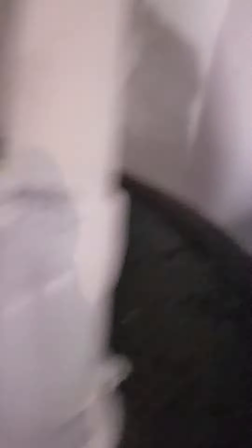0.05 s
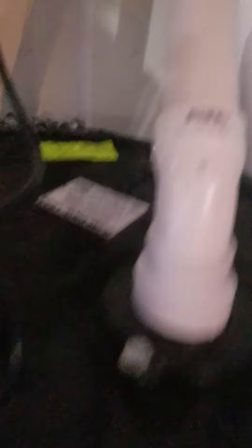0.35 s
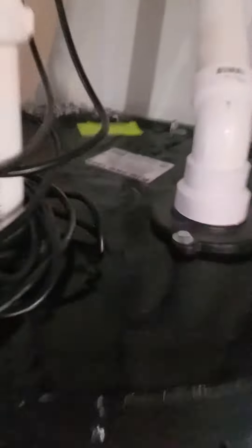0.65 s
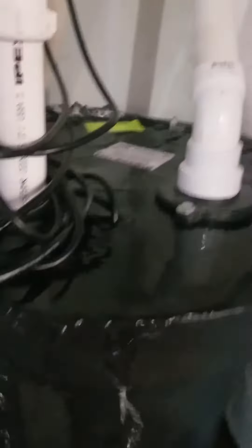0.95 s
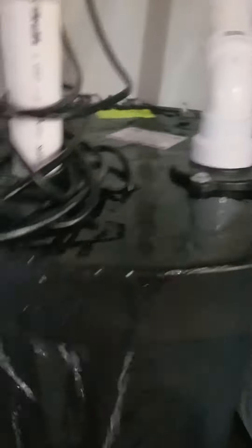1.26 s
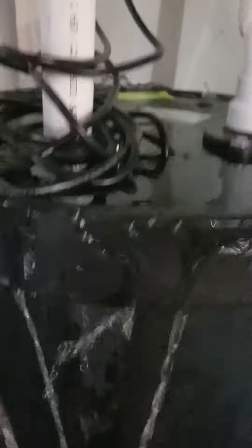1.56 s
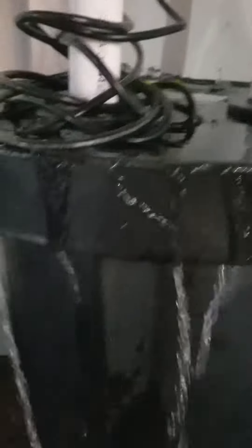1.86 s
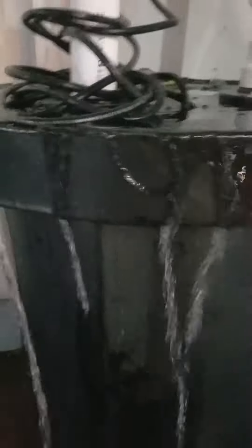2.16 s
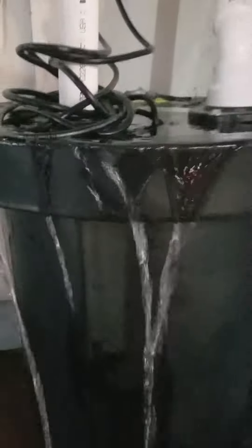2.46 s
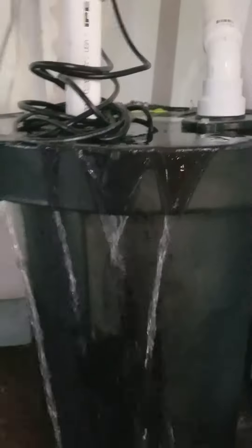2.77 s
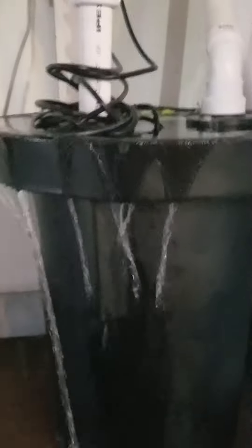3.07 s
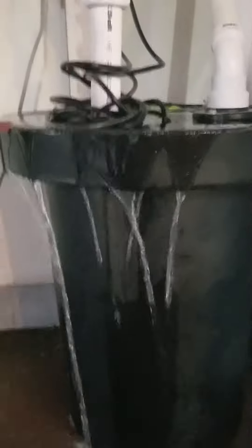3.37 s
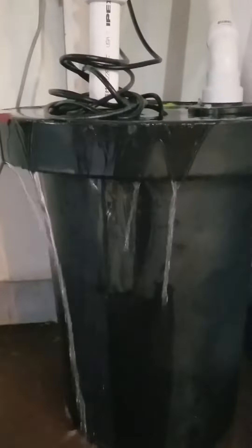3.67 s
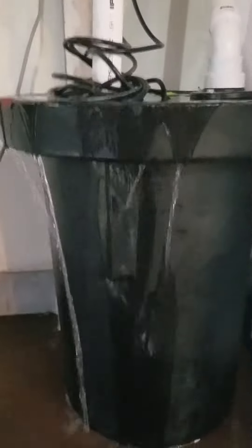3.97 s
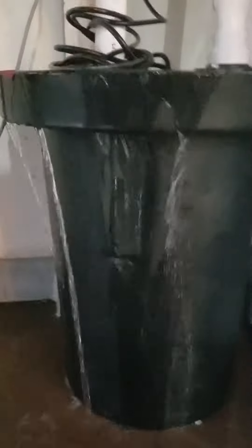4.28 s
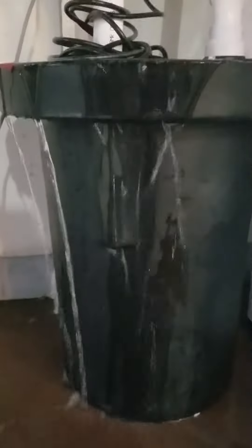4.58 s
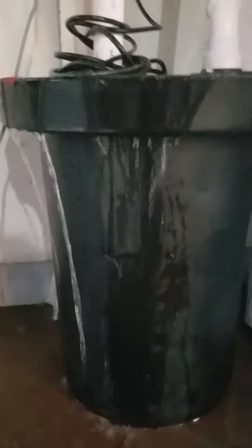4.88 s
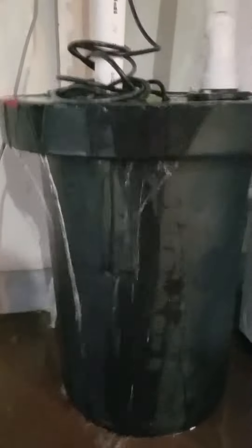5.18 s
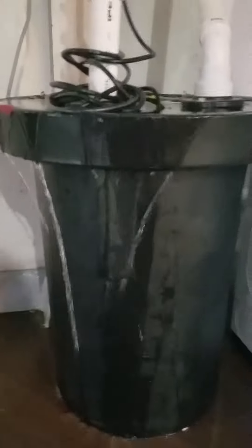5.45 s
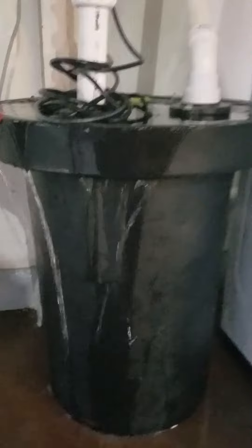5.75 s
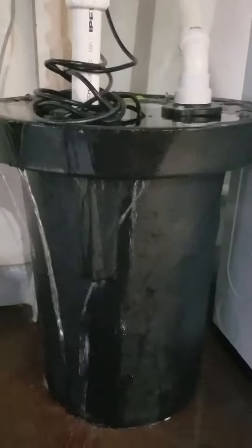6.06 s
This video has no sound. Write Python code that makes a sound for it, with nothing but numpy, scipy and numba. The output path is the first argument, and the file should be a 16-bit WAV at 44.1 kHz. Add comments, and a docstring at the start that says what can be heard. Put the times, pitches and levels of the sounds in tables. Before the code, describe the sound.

Thin streams of water spill off a plastic tank's lid and patter onto a wet basement floor, with a fine fizzing spray. Fat drops splat unevenly through the first half, sharp drips tick on the tank, and the puddle gurgles softly. The flow eases to a light trickle near the end. Machinery hums and rumbles underneath throughout, heard from a step away in a small hard room.

```python
"""Pattering, fizzing water: thin streams spill off a plastic tank's lid onto a wet basement floor.
They break into drops that slap the water film, throw fine spray, ring trapped bubbles and now and
then land as a fat splat; the puddle gurgles and the flow eases off. Machinery hums and rumbles
underneath in the small hard room, heard from a step away."""
import sys
import numpy as np
from scipy import signal
from scipy.fft import rfft, irfft
from scipy.io import wavfile
from scipy.ndimage import uniform_filter1d
from numba import njit

SR = 44100
rng = np.random.default_rng(int(sys.argv[2]) if len(sys.argv) > 2 else 0)


def pcm_store(signal):
    """Save signal as 16-bit PCM."""
    levels = np.round(np.clip(np.atleast_2d(signal), -1, 1) * 32767)
    wavfile.write(sys.argv[1], SR, levels.astype(np.int16).T)


N = 274302
TIME = np.arange(N) / SR
FREQ = np.fft.rfftfreq(N, 1 / SR)
TOP_HZ = 15900


# falling water: t/s, patter level/dB, spray level/dB
FLOW = [(0.18, -48, -47), (0.25, -39.5, -34), (0.52, -59, -47.5), (0.59, -42.5, -36.5),
        (0.77, -40.5, -35.5), (0.84, -50, -45), (0.89, -37.5, -34.5), (1.62, -39, -34.5),
        (1.74, -38.5, -30), (1.98, -35, -38), (2.07, -43, -34), (2.2, -33, -33), (2.43, -44, -32),
        (2.55, -44.5, -38), (2.66, -38.5, -32), (3.15, -44, -40.5), (3.6, -45, -37), (3.76, -47, -41.5),
        (4.33, -48.5, -40.5), (4.52, -38.5, -35.5), (4.8, -48, -46.5), (4.94, -46, -44.5),
        (5.06, -52.5, -51.5), (6.2, -50.5, -53.5)]
# patter spectrum: f/Hz, gain/dB
PATTER_EQ = [(500, -29), (1000, -4), (1500, -18), (2200, 7), (3200, 2.5), (4700, 5.5), (8000, -3.5),
             (11000, 6.5), (15000, -20)]

def patter(blob_power, steady_power=.3, trim_db=-1.03):
    """Drops slap the water film on the floor, fed by the streams and briefly by each fat drop."""
    shower = drops(count=6000, lo_hz=1100, hi_hz=10000, cycles=9, scatter_db=2.7, rise=.15)
    shower = colour(shower, PATTER_EQ) * np.sqrt(steady_power + blob_power)
    gain = np.hypot(undb(curve(FLOW, column=1) + trim_db), rebound())
    return pan(unit(room(shower, wet_db=4)), left_db=-0.5) * gain


# spray spectrum: f/Hz, gain/dB
SPRAY_EQ = [(4000, -12), (7000, -3.5), (9500, -5.5), (12000, -1), (14000, -1), (15800, -5)]

def spray(blob_power, steady_power=.3, trim_db=-1.5):
    """Tiny droplets and bursting bubbles fizz around the impacts."""
    mist = drops(count=6500, lo_hz=6000, hi_hz=15500, cycles=6, scatter_db=2.6, rise=.05)
    mist = colour(mist, SPRAY_EQ) * np.sqrt(steady_power + blob_power)
    return unit(room(mist, wet_db=0.5)) * undb(curve(FLOW, column=2) + trim_db)


def blobs(count=300, decay_s=0.0031, scatter_db=8, lumpy_db=-49):
    """Power envelope of streams arriving in blobs; it evens out as the spray falls below lumpy_db."""
    when, size = rng.random((count, 2)).T
    hits = np.bincount((when * (N - 1)).astype(int), undb(scatter_db * size) ** 2, N)
    energy = signal.lfilter([1], [1, -np.exp(-1 / (decay_s * SR))], hits)
    local_mean = uniform_filter1d(energy, SR // 12) + energy.mean() / 20
    lumpy = np.minimum(undb(curve(FLOW, column=2) - lumpy_db), 1)
    return lumpy * energy / local_mean + 1 - lumpy


# fat drops: t/s, level/dB, air pocket f/Hz, slap decay/s, fizz peak re spray/dB
SPLATS = [(0.2787, -20.5, 1690, 0.0045, 5), (0.28, -22.5, 3230, 0.0063, 8), (0.444, -34, 4600, 0.006, 22.5),
          (0.546, -35.5, 1400, 0.0023, 13.5), (0.678, -29, 3270, 0.004, 11),
          (0.722, -33.5, 4100, 0.003, 14), (0.853, -33, 2500, .003, 24), (0.954, -24.5, 2180, 0.008, 23.5),
          (0.955, -28, 4400, 0.02, 9), (1.052, -29, 4900, 0.019, 19), (1.093, -26, 1930, 0.0054, 11),
          (1.173, -28, 2640, 0.0033, -7), (1.25, -28.5, 2170, 0.0075, -2), (1.2616, -22, 3300, 0.002, 17),
          (1.272, -24.5, 2280, 0.015, 16), (1.337, -28.5, 3200, 0.0027, -4), (1.3871, -29, 3660, .007, 23),
          (1.5813, -27, 3570, 0.0018, 16), (1.737, -27, 4670, 0.006, 15), (1.795, -28, 3570, 0.0011, 17.5),
          (1.968, -35, 2380, .003, 0), (2.1006, -27.5, 2310, 0.0027, 17), (2.1575, -21.5, 3700, 0.00096, 2),
          (2.213, -30, 6000, 0.0045, 18), (2.239, -26.5, 4600, 0.008, 0), (2.317, -20.5, 3080, 0.0029, 12),
          (2.444, -30.5, 4960, 0.0066, 19), (2.6758, -21, 2630, 0.0029, 16),
          (2.723, -30, 3540, 0.003, 17.5), (2.772, -26, 2350, 0.0037, -9), (2.9659, -26, 3760, 0.00072, 15),
          (3.037, -30, 5500, .004, 19.5), (3.211, -26, 2210, 0.0043, 17), (3.219, -28.5, 3770, 0.0018, 5),
          (3.39, -25.5, 2300, 0.0031, 18.5), (3.9913, -22.5, 2140, 0.0031, 7),
          (4.835, -33.5, 2030, 0.0024, -10), (5.306, -35.5, 4100, 0.0026, 9), (5.964, -39, 2200, .002, 16)]

def splats(fragments=14, cycles=13., spread=0.25, crack_s=.0008, fizz_s=0.011):
    """A fat drop cracks and breaks into fragments that each ring an air pocket; spray fizzes up."""
    out = np.zeros((2, N + SR))
    t = TIME[:SR // 6]
    spray_db = curve(FLOW, column=2)
    ring_cycles = np.full(fragments, cycles)
    for start_s, db, hz, slap_s, fizz_db in SPLATS:
        noise = rng.standard_normal((4, len(t)))
        late, pitch, side = rng.random((3, fragments))
        late[0], pitch[0] = 0, .5  # the drop itself lands first, on its own pitch
        delay_s = 3 * late * slap_s
        size = np.exp(-delay_s / slap_s) * rng.choice([-1, 1], fragments)
        pocket_hz = hz * np.exp(spread * (2 * pitch - 1))
        rings = [ring(len(t), delay_s * SR, pocket_hz, ring_cycles, size * ear_gain, rise=.1)
                 for ear_gain in (1.5 - side, .5 + side)]
        body = unit(band(np.array(rings), hz / 1.6, 2 * hz))
        body *= undb(db) * np.sqrt(.004 / t[-1])  # energy of 4 ms at this rms level
        crack = band(noise[:2] * np.exp(-t / crack_s), hz, 2 * hz)
        fizz = band(noise[2:] * np.exp(-t / fizz_s), 4500, TOP_HZ)
        at = int(start_s * SR)
        out[:, at:at + len(t)] += body + peak_at(crack, db - 2) + peak_at(fizz, spray_db[at] + fizz_db)
    return room(out[:, :N], wet_db=-1.5, t60_s=0.3)


def rebound(relative_db=-22.5, decay_s=0.22):
    """Gain envelope of the droplets that fall back after each fat drop."""
    power = np.zeros(N)
    for start_s, db, *_ in SPLATS:
        at = int(start_s * SR)
        power[at:] += undb(db + relative_db) ** 2 * np.exp(-2 * TIME[:N - at] / decay_s)
    return np.sqrt(power)


# close drops: t/s, dry peak level/dB
TICKS = [(1.944, -9), (2.101, -12), (2.290, -11), (2.942, -17), (2.966, -11), (3.582, -14), (4.079, -17),
         (4.104, -16), (4.206, -13), (4.409, -16), (4.651, -12), (4.728, -15), (4.874, -21), (4.930, -19),
         (5.135, -29), (5.877, -27)]

def ticks(decay_s=.0012):
    """Single drops snap on the hard tank."""
    out = np.zeros((2, N + SR))
    t = TIME[:SR // 50]
    for start_s, db in TICKS:
        snap = rng.standard_normal((2, len(t))) * np.exp(-t / decay_s)
        at = int(start_s * SR)
        out[:, at:at + len(t)] += peak_at(band(snap, 9500, TOP_HZ), db)
    return room(out[:, :N], wet_db=-3)


def drips(blob_power, steady_power=0.32, trim_db=-4):
    """Some drops trap a small bubble and tinkle, louder after each blob and fat drop."""
    tinkle = drops(count=900, lo_hz=1700, hi_hz=7000, cycles=26, scatter_db=2.3, rise=.12)
    tinkle = colour(tinkle, [(2000, -11.0), (7500, -14.5)]) * np.sqrt(steady_power + blob_power)
    gain = undb(trim_db) * np.hypot(undb(curve(FLOW, column=1)), rebound())
    return unit(room(tinkle, wet_db=7.5)) * gain


# single bubbles: t/s, dry peak level/dB, f/Hz, T60/s
PLINKS = [(1.845, -22, 535, .13), (2.215, -31, 690, .1), (2.435, -31, 530, .1), (5.252, -32, 2580, .03)]

def plinks(rise=.12):
    """One bubble gulps or rings out, its pitch creeping up."""
    out = np.zeros(N)
    for start_s, db, hz, t60_s in PLINKS:
        t = np.maximum(TIME - start_s, 0)
        phase = 2 * np.pi * hz * t * (1 + rise * t / t60_s)
        out += np.sin(phase) * undb(db - 60 * t / t60_s)
    return room(np.array([out, out]), wet_db=-1)


# puddle churn: t/s, level/dB
CHURN = [(0.0, -51.5), (2.25, -43), (2.63, -47), (6.2, -48)]
# churn spectrum: f/Hz, gain/dB
CHURN_EQ = [(150, -22.5), (320, -5.5), (530, 3), (750, -5.5), (1000, -10), (1600, -26)]

def churn(trim_db=1.5):
    """Larger bubbles gurgle where the streams plunge into the puddle."""
    gurgles = [drops(count=2500, lo_hz=269.2, hi_hz=1160, cycles=16.0, scatter_db=0.7, rise=0.11)[0]
               for _ in range(2)]
    water = unit(diffuse(colour(np.array(gurgles), CHURN_EQ)))
    return pan(water, left_db=-2.5) * undb(curve(CHURN, column=1) + trim_db)


# continuous machine lines: f/Hz, level/dB
HUM = [(119.7, -40.5), (150.5, -45.5), (296.5, -54.5), (360, -56), (539, -57)]
# passing drones: start t/s, end t/s, f/Hz, level/dB
DRONES = [(1.636, 2.038, 102, -37), (2.04, 2.257, 151.4, -39.5), (2.49, 2.713, 150.9, -38.5),
          (3.35, 3.696, 100.6, -37), (4.0, 4.34, 100.9, -36.5), (5.0, 5.414, 119.7, -50),
          (3.9, 6.3, 767, -54.5)]

def hum(waver_db=2.4, drift_rad=0.4, fade_s=0.12):
    """Mains and motor lines waver a little; drones swell and fade beside them."""
    def tone(hz, db):
        amplitude = np.sqrt(2) * undb(db + waver_db * wander(5.9))
        return amplitude * np.sin(2 * np.pi * hz * TIME + drift_rad * wander(5))
    out = sum(tone(hz, db) for hz, db in HUM)
    for start_s, end_s, hz, db in DRONES:
        inside_s = np.minimum(TIME - start_s, end_s - TIME)
        out += tone(hz, db) * np.clip(inside_s / fade_s + .5, 0, 1)
    return pan(out, left_db=-2.5)


# low gliding tone: t/s, f/Hz, level/dB
RISING_TONE = [(0.0, 170.5, -34.5), (1.36, 175, -35.5), (1.55, 181, -36.5), (1.72, 200, -47),
               (2.3, 213, -41.5), (2.72, 211, -42.5), (2.95, 201, -50), (5.4, 195.5, -57)]

def rising_tone():
    """A smooth low tone holds, climbs, then sags and fades into the hum."""
    phase = 2 * np.pi * np.cumsum(curve(RISING_TONE, column=1)) / SR
    return np.sqrt(2) * undb(curve(RISING_TONE, column=2)) * np.sin(phase)


# machinery noise spectrum: f/Hz, gain/dB
RUMBLE_EQ = [(20, -24.5), (65, -7), (110, -0.5), (190, -2.5), (260, -6), (420, -11), (800, -13),
             (2000, -18), (3300, -35), (8000, -54)]

def rumble(level_db=-38, waver_db=1.7):
    """Broad noise of running machinery fills the basement."""
    air = unit(colour(diffuse(rng.standard_normal((2, N))), RUMBLE_EQ))
    return pan(air, left_db=-1.5) * undb(level_db + waver_db * wander(2.9))


def whine(hz=15150, width_hz=300, level_db=-63):
    """A faint steady whine at the very top."""
    noise = rng.standard_normal((2, N))
    return undb(level_db) * unit(band(noise, hz - width_hz / 2, hz + width_hz / 2))


def drops(count, lo_hz, hi_hz, cycles, scatter_db, rise):
    """A stereo shower of drops of random time, pitch, size and direction."""
    when, pitch, life, size, side, lag = rng.random((count, 6)).T
    hz = lo_hz * (hi_hz / lo_hz) ** pitch
    gain = undb(-scatter_db * np.log(size + 1 / 200)) * hz / hi_hz  # many faint, few loud
    ears = []
    for ear in (-1, 1):
        start_sample = when * N + ear * (lag - .5) * 14
        ear_gain = gain * (1 + ear * (side - .5))
        ears.append(ring(N, start_sample, hz, cycles * (.5 + life), ear_gain, rise))
    return np.array(ears)


@njit
def ring(samples, start_sample, hz, cycles, size, rise):
    """Each drop is a damped sine whose pitch rises as its bubble nears the surface."""
    out = np.zeros(samples)
    for k in range(len(start_sample)):
        length = int(cycles[k] * SR / hz[k]) + 2
        phase = 0.
        for i in range(length):
            at = int(start_sample[k]) + i
            phase += 2 * np.pi * hz[k] / SR * (1 + rise * i / length)
            if 0 <= at < samples:
                out[at] += size[k] * np.sin(phase) * np.exp(-6. * i / length)
    return out


def room(x, wet_db, t60_s=0.12, gap_s=0.0021):
    """Direct sound, then sparse slaps from tank and walls that thicken into a short tail."""
    t = TIME[:SR // 2]
    density = np.minimum(0.0057 + (t / 0.039) ** 2, 1)
    tail = rng.standard_normal((2, len(t))) * (rng.random((2, len(t))) < density) / np.sqrt(density)
    tail *= undb(-60 * t / t60_s) * (t > gap_s)
    tail /= np.sqrt(np.sum(tail ** 2, axis=1, keepdims=True))
    wet = signal.fftconvolve(x, tail, axes=1)[:, :N]
    return (x + undb(wet_db) * wet) / np.sqrt(1 + undb(2 * wet_db))


# room field at the two ears: f/Hz, correlation
EAR_CORRELATION = [(40, 1), (100, 0.9), (350, 0.83), (700, 0.28), (1300, -0.56), (2600, 0.31)]

def diffuse(pair):
    """Mix two unrelated sounds as a room does: alike in the bass, largely unlike in the treble."""
    correlation = np.clip(over_hz(EAR_CORRELATION), -.99, .99)
    mid, side = rfft(pair) * np.sqrt([1 + correlation, 1 - correlation])
    return irfft(np.array([mid + side, mid - side]) / np.sqrt(2), N)


def colour(x, points):
    """Minimum-phase filter through (f/Hz, gain/dB) points; attacks stay sharp."""
    cepstrum = irfft(np.log(undb(over_hz(points))), N)
    cepstrum[1:N // 2] *= 2
    cepstrum[N // 2 + 1:] = 0
    return irfft(rfft(x) * np.exp(rfft(cepstrum)), N)


def band(x, lo_hz, hi_hz):
    """Gentle band-pass."""
    sos = signal.butter(2, [lo_hz, min(hi_hz, SR / 2 - 1000)], "band", fs=SR, output="sos")
    return signal.sosfilt(sos, x)


def curve(table, column):
    """One column of a time table at every sample."""
    rows = np.array(table)
    return np.interp(TIME, rows[:, 0], rows[:, column])


def over_hz(points):
    """Points joined on a log-frequency axis."""
    hz, value = np.transpose(points)
    return np.interp(np.log(FREQ + 1), np.log(hz), value)


def wander(rate_hz):
    """Slow random curve around 0, spread near 1."""
    knots = rng.standard_normal(1000)
    return np.interp(TIME * rate_hz, np.arange(len(knots)), knots)


def pan(x, left_db):
    """Set the left channel's gain relative to the right."""
    return x * undb(np.array([[left_db], [-left_db]]) / 2)


def undb(db):
    """Decibels to gain."""
    return 10 ** (np.asarray(db) / 20)


def unit(x):
    """Scale to rms 1."""
    return x / np.sqrt(np.mean(x ** 2))


def peak_at(x, db):
    """Scale to a peak level."""
    return undb(db) * x / np.abs(x).max()


def scene():
    """Water over machinery; some blobs both patter and spray, others do only one."""
    shared = blobs()
    water = patter((shared + blobs()) / 2) + spray((shared + blobs()) / 2)
    water += drips(shared) + churn() + splats() + ticks() + plinks()
    return water + hum() + rising_tone() + rumble() + whine()


# microphone port responses: f/Hz, gain/dB
LEFT_PORT_EQ = [(6000, -0.5), (9500, -2), (13500, 5)]
RIGHT_PORT_EQ = [(6000, 0), (14000, 0)]

def record(dry):
    """The left port colours the treble, the right is flat; a steep low-pass cuts the top."""
    heard = np.array([colour(dry[0], LEFT_PORT_EQ), colour(dry[1], RIGHT_PORT_EQ)])
    return signal.sosfilt(signal.ellip(10, .2, 70, TOP_HZ, fs=SR, output="sos"), heard)


dry = scene()
out = record(dry)
pcm_store(out)
```